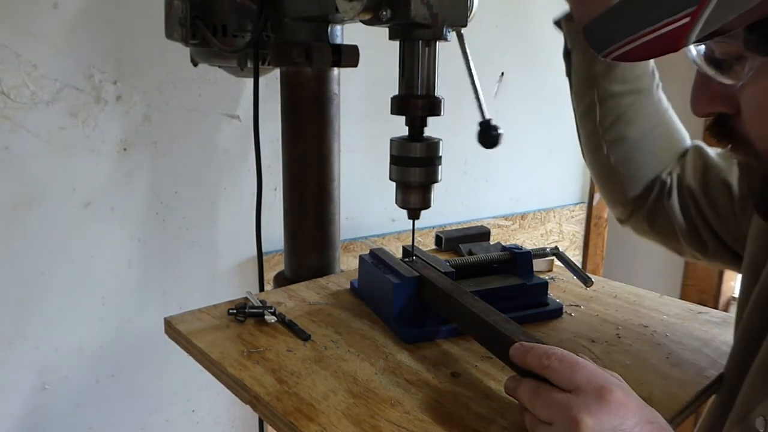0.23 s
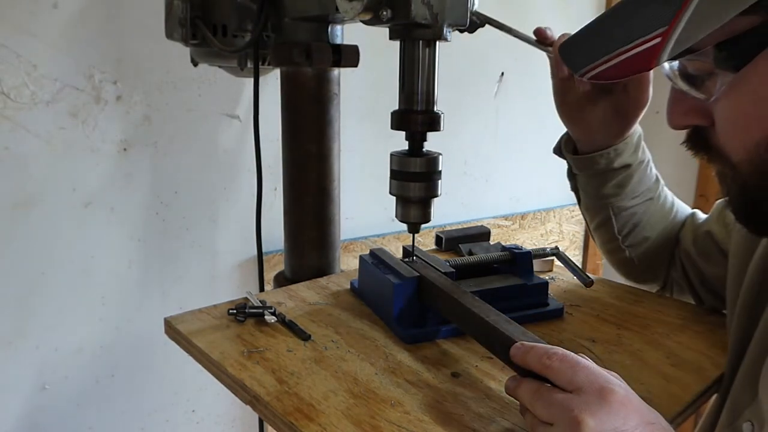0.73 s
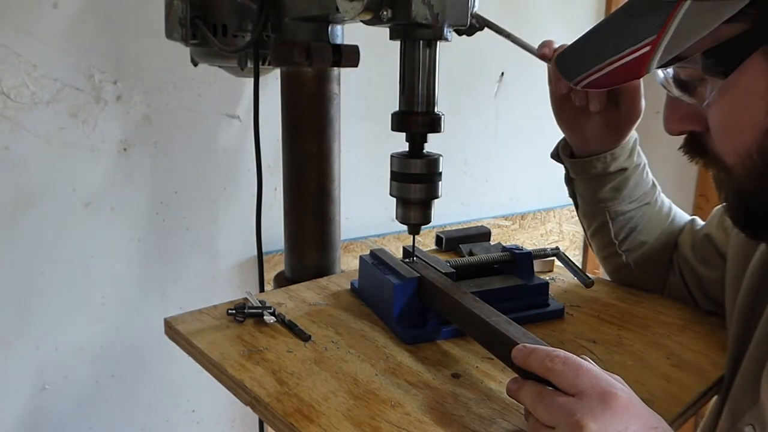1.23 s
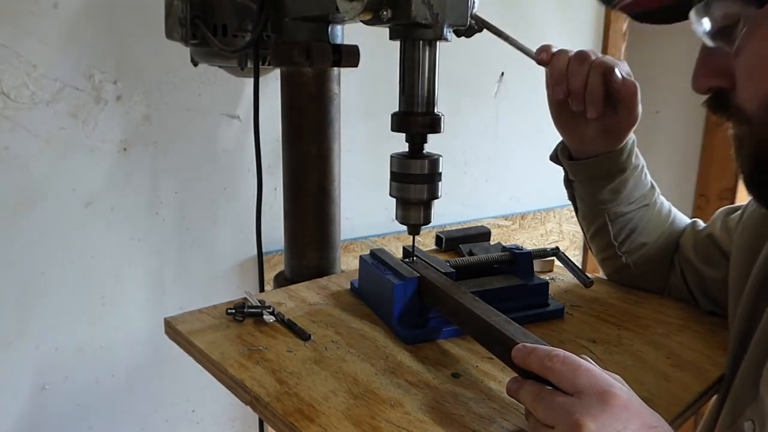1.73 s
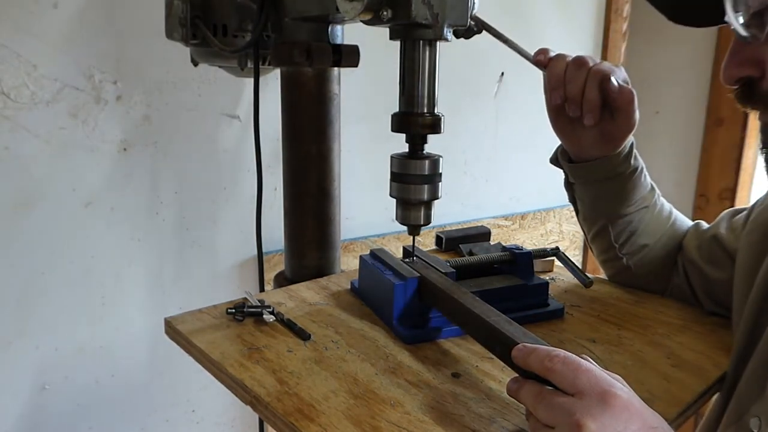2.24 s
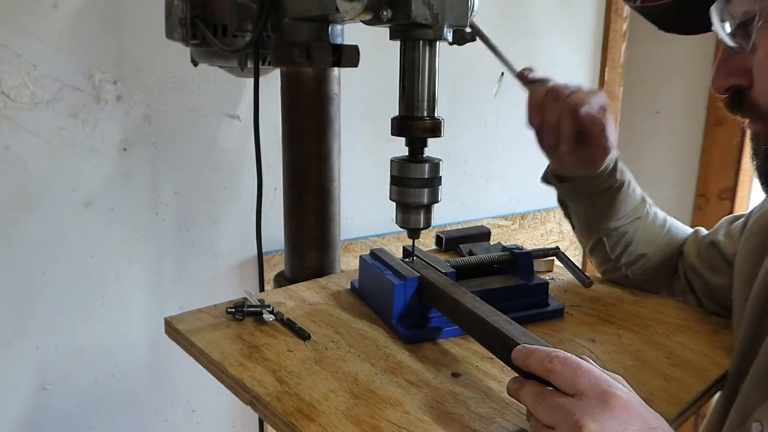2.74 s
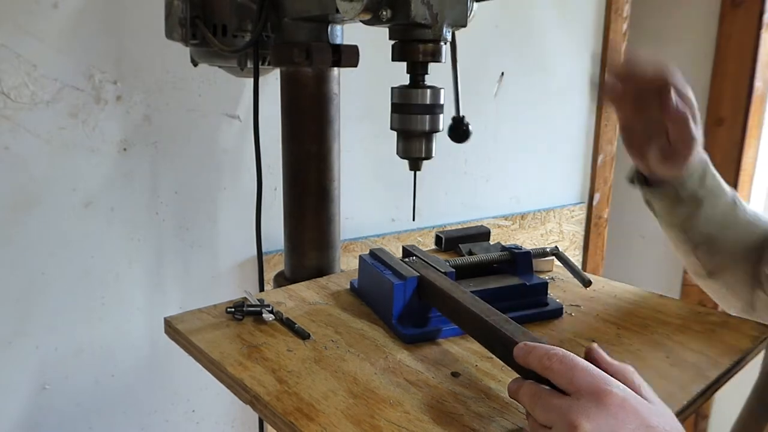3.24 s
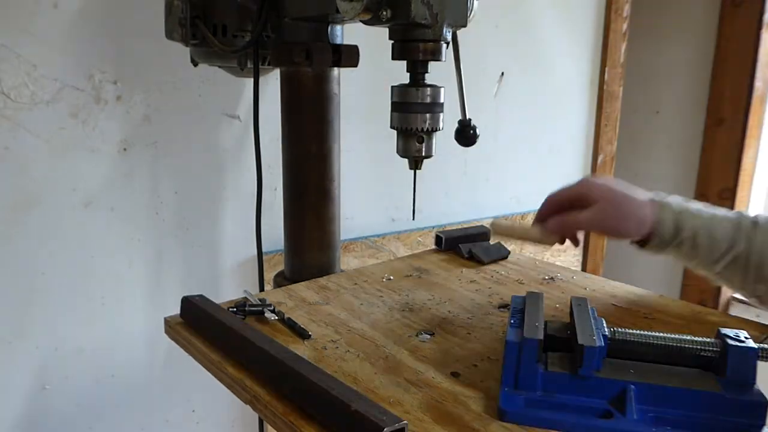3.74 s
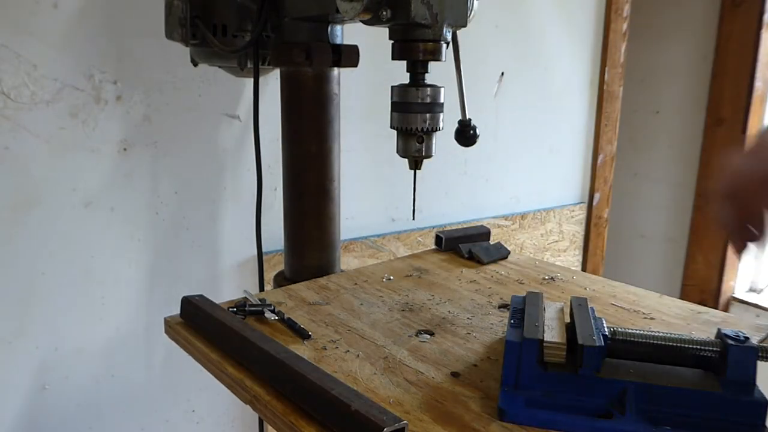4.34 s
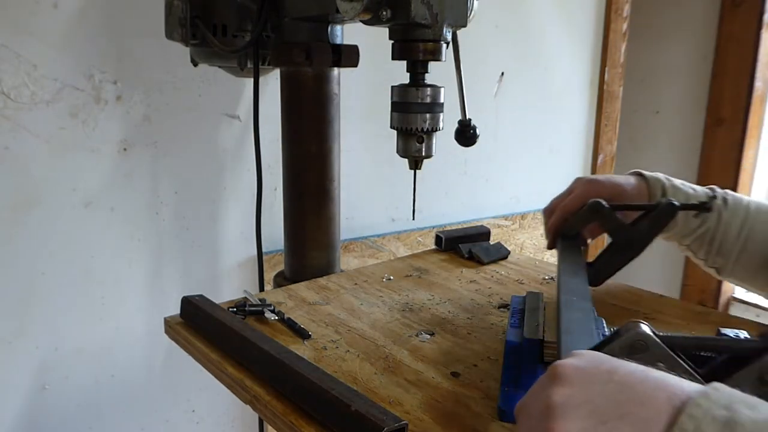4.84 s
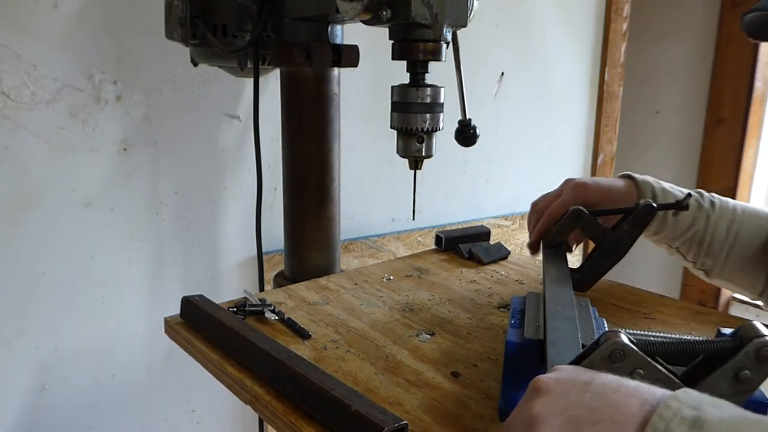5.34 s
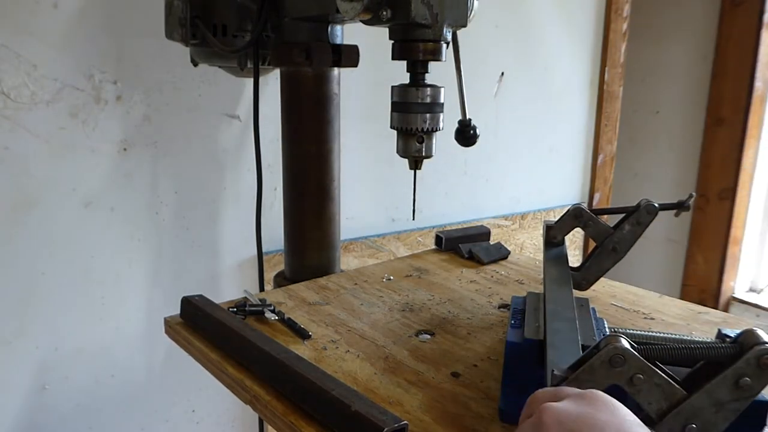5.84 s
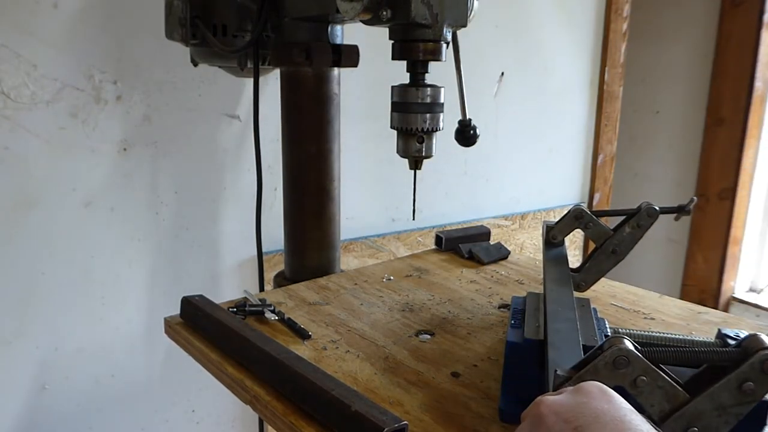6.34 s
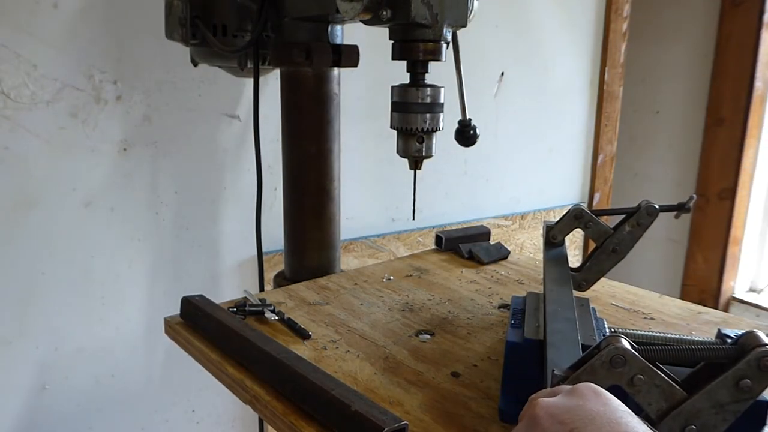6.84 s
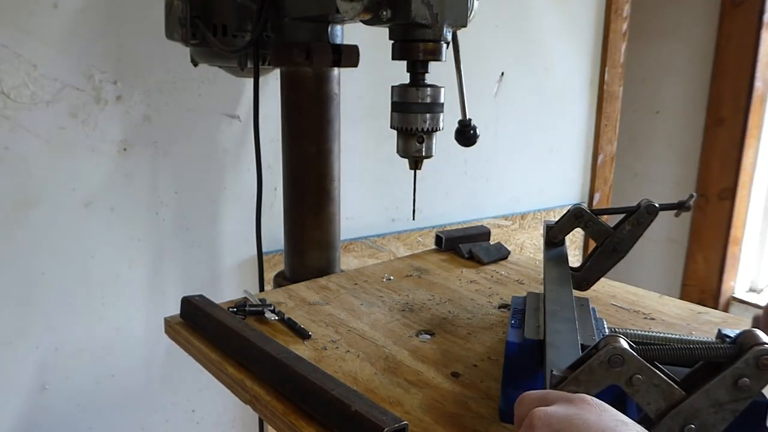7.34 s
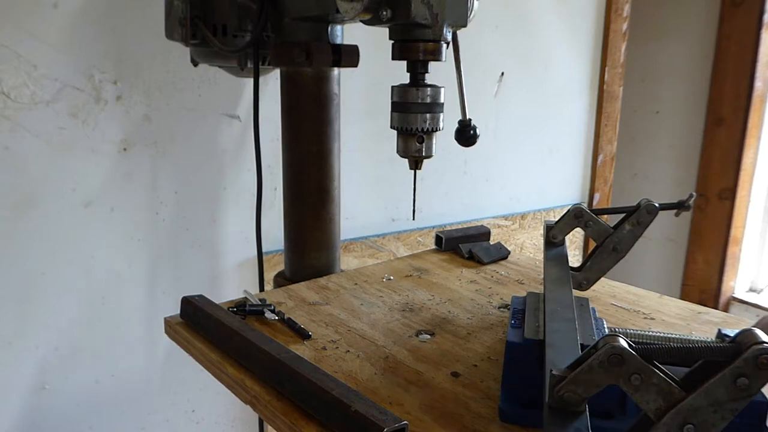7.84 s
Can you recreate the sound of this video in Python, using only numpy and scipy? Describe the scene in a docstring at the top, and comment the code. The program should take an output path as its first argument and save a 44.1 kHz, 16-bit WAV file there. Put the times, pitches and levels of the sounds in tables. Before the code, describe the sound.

Close in a small workshop, a drill press hums and rattles steadily while its bit scrapes, chatters and squeaks in steel tubing. It grabs on breaking through, the quill snaps back with a loud clack, and the machine abruptly stops. In the quiet, a wood block is tapped into a vise with dull, clicky knocks. Steel then knocks and snaps, two blows very sharp, followed by small clinks, soft rubbing and near silence.

```python
"""A drill press bores square steel tubing in a small workshop: hum and belt rattle ring its castings while the
fed bit scrapes, chatters and squeaks, then breaks through the wall. The quill springs back with a clack and the
machine sound breaks off. A wood block is then knocked down into the vise, and tubing and clamps knock, snap and
clink on the plywood table. Noise through resonances makes the cuts and cracks; decaying sines make the rings."""
import sys
import numpy as np
from scipy import signal
from scipy.fft import rfft, irfft, next_fast_len
from scipy.io import wavfile

SR = 44100
rng = np.random.default_rng(int(sys.argv[2]) if len(sys.argv) > 2 else 0)


def store_pcm(level_fs):
    """Save levels as 16-bit WAV."""
    pcm = np.round(np.clip(level_fs, -1, 1) * 32767).astype(np.int16)
    wavfile.write(sys.argv[1], SR, np.atleast_2d(pcm).T)


N = 356328
T = np.arange(N) / SR

QUILL_S = 3.184  # the quill reaches its stop

# modes of the stock in the vise and the steel around it: f/Hz, level/dB, t60/s
STEEL = [(444, -11.5, 0.2), (541, -5, 0.16), (618, -11, 0.23), (824, -4.5, 0.23), (937, -2, 0.23),
         (1034, 4, 0.12), (1079, 6, 0.21), (1310, -3.5, 0.17), (1422, 0, 0.28), (1540, -2, 0.26),
         (1600, 0.5, 0.23), (1726, 0.5, 0.13)]
# crowd of short modes in steel: f/Hz, density/dB per Hz
STEEL_CRACK = [(30, -42.5), (100, -37.5), (170, -22.5), (280, -15), (500, -7), (1100, 8.5), (1900, 5.5),
               (2150, -8.5), (3600, -14.5), (4700, -8), (6500, -11), (9000, -15), (12000, -21),
               (13200, -19.5), (15000, -20), (16000, -39)]
# modes of the plywood table: f/Hz, level/dB, t60/s
TABLE = [(369.7, 3, 0.7), (435, 0.5, 0.22), (3480, -29.5, .9)]
# modes of the stand: f/Hz, level/dB, t60/s
STAND = [(66, -2.5, 0.07), (100, -8, 0.1)]


def undb(db):
    """Decibels to gain."""
    return 10 ** (np.asarray(db) / 20)


def unit(x):
    """Scale to rms 1."""
    return x / np.sqrt(np.mean(x ** 2))


def curve(rows):
    """Gain over time from (t/s, level/dB) rows."""
    return undb(np.interp(T, *np.transpose(rows)))


def fade(t, t60):
    """Exponential decay that falls 60 dB in t60 seconds."""
    return np.exp(-np.log(1000) * t / t60)


def walk(rate):
    """Smooth random wander, spread near 1, with a new target `rate` times a second."""
    knots = rng.standard_normal(4096)
    return np.interp(T * rate, np.arange(len(knots)), knots)


def grains(per_s, spread_db):
    """Random tiny impacts of uneven size, as mid and side."""
    hits = rng.random(N) < per_s / SR
    sizes = undb(spread_db * rng.standard_normal(N))
    return unit(hits * sizes * rng.standard_normal((2, N)))


def colour(x, points, peaks=()):
    """Minimum-phase filter from a broad (f/Hz, dB) spectrum plus (f/Hz, width/Hz, dB) resonances."""
    size = 2 * next_fast_len(x.shape[-1] // 2 + 2048)
    f = np.arange(size // 2 + 1) * SR / size
    hz, db = np.transpose(points)
    power = undb(np.interp(np.log(f + 1), np.log(hz), db)) ** 2
    for centre, width, peak_db in peaks:
        power += undb(peak_db) ** 2 / (1 + ((f - centre) / width) ** 2) ** 2
    # folding the cepstrum keeps all the ringing after the blow
    cepstrum = irfft(np.log(power))[:size // 2]
    cepstrum[0] /= 2
    return irfft(rfft(x, size) * np.exp(rfft(cepstrum, size)))[..., :x.shape[-1]]


def resonances(modes, lift_db):
    """The modes of a body as the resonances that a rub or a rattle passes through."""
    return [(hz, 16, db + lift_db) for hz, db, _ in modes]  # each 16 Hz wide


def sing(x, hz, q):
    """A narrow resonance whose centre moves: shift it down to 0 Hz, smooth, shift it back."""
    turn = np.exp(2j * np.pi * np.cumsum(hz) / SR)
    pole = np.exp(-np.pi * hz.mean() / q / SR)
    return unit((signal.lfilter([1], [1, -pole], x / turn) * turn).real)


def add(out, s, sound):
    """Mix a sound in at its time."""
    start = int(s * SR)
    out[:, start:start + sound.shape[1]] += sound[:, :N - start]


def widen(x, side_db):
    """Change the side of a mid and side pair."""
    return x * undb([[0], [side_db]])


def chime(modes, rise_s, scatter, size):
    """A part rings in its own modes after a strike; close reflections roughen the ring."""
    t = np.arange(size) / SR
    out = np.zeros((2, size))
    for hz, db, t60 in modes:
        echoes = signal.resample(rng.standard_normal((2, 2, size // 300)), size, axis=-1)
        shimmer = 1 + scatter * (echoes[0] + 1j * echoes[1])
        start_phase = np.exp(2j * np.pi * rng.random((2, 1)))
        tone = (shimmer * np.exp(2j * np.pi * hz * t) * start_phase).imag
        out += undb(db) * fade(t, t60) * tone
    return out * (1 - np.exp(-t / rise_s))


def struck(s, db, contact_s, weight, bright):
    """A clean knock: longer contact is heavier and duller, by (dB at 1 ms, dB per doubling)."""
    doublings = np.log2(abs(contact_s) * 1000 + 1e-3)
    weight_db = weight[0] + weight[1] * doublings
    bright_db = bright[0] + bright[1] * doublings
    return s, db, weight_db, bright_db, contact_s, 0


def blows(rows, modes, spectrum, tick_db, crack_t60, room_db, room_t60, tail_db, ring_db, trim_db, lift_db=10):
    """Each blow is a contact tick, a crack that rattles through the modes while the part slides, a ring and a room tail.

    Rows: t/s, level/dB, weight/dB (lows re level), brightness/dB (highs re level), contact/s, slide/s.
    """
    judder_per_s, judder_db = 270, 3.5  # loose parts rattle as the blow dies away
    t = np.arange(SR * 2 // 5) / SR
    early = SR // 50  # levels are set over the first 20 ms
    hz, db, t60 = np.transpose(modes)
    bank = undb(db)[:, None] * fade(t, t60[:, None]) * np.exp(2j * np.pi * hz[:, None] * t)
    edges = ((700, "low"), ((700, 2500), "band"), (2500, "high"))
    bands = [signal.butter(3, edge, kind, fs=SR, output="sos") for edge, kind in edges]
    out = np.zeros((2, N))
    for s, body_db, weight_db, bright_db, contact_s, length_s in rows:
        press = 1 - np.exp(-t / (abs(contact_s) + 1 / SR))
        free = np.maximum(t - length_s, 0)
        envelope = fade(free, crack_t60) + undb(room_db) * fade(free, room_t60) + undb(tail_db) * fade(free, 0.9)
        # every point of contact shares the force out differently among the modes
        share_phase = np.exp(2j * np.pi * rng.random((2, len(hz))))
        share = undb(2 * rng.standard_normal((2, len(hz)))) * share_phase
        ring = (share @ bank).imag * press
        wobble = np.interp(t * judder_per_s, np.arange(len(t)), rng.standard_normal(len(t)))
        force = rng.standard_normal((2, len(t))) * envelope * undb(judder_db * wobble) * press
        force[0, 0] += undb(tick_db) * press[SR // 4000]  # only a brief contact gives a sharp tick
        crack = colour(force, spectrum, resonances(modes, lift_db))
        sound = crack / crack[:, :early].std() + undb(ring_db) * ring / ring[:, :early].std()
        for sos, band_db in zip(bands, (weight_db, 0, bright_db)):
            part = signal.sosfilt(sos, sound)
            add(out, s, part / part[0, :early].std() * undb(body_db + band_db + trim_db))
    return out


def clicks(rows, spectrum, buzz_db, buzz_t60, room_db):
    """A hard contact: one sharp pulse, a few milliseconds of buzzing rebounds, and the room."""
    t = np.arange(SR // 4) / SR
    force = np.zeros((2, N))
    for s, db in rows:
        envelope = undb(buzz_db) * fade(t, buzz_t60) + undb(room_db) * fade(t, 0.22)
        hit = rng.standard_normal((2, len(t))) * envelope
        hit[0, 0] = 1
        add(force, s, undb(db) * hit)
    return colour(force, spectrum)


def drill(chatter_db=2.5, scrape_db=-0.5, rasp_db=1.36, drift=.025, flicker_hz=450):
    """Rattle pulsing with the motor's torque, hum whose upper tones flicker, and chips tearing off under the bit."""
    # pressure on the bit: t/s, cutting level/dB
    feed_points = [(0, -25.5), (.3, -34.5), (.79, -25.5), (.86, -20), (2.15, -21), (2.55, -25),
                   (2.85, -22.5), (2.92, -40), (3.12, -23.5), (3.26, -34.5)]
    # motor and pulley tones: f/Hz, level before flicker/dB rms
    hum_tones = [(150.4, -57.5), (203, -58), (240, -56), (366, -47), (480, -41.5), (533, -37.5), (720, -40),
                 (868, -39.5), (959, -35.5)]
    # resonances of head, belt cover and column: f/Hz, width/Hz, level/dB
    castings = [(456, 18, -1.5), (537, 19, 3.5), (606.7, 17, 4.5), (688, 21, 1), (802, 16, 5.5),
                (872.6, 20, 4.5), (923, 13, 3.5), (1052, 23, 0.5), (1154, 26, 4.5), (1293, 14, 2.5),
                (1437, 41, -5.5), (1645, 36, -1), (1798, 28, 1), (1908, 26, -1.5), (2072, 44, 3.5),
                (2175, 14, 1), (2458, 14, 5), (2565, 11, 5.5), (2690, 110, -5), (2995, 27, -1),
                (3310, 26, -1.5), (3600, 70, -9.5), (4520, 50, -3.5), (5490, 29, -10.5), (5800, 50, -11.5),
                (6010, 26, -8), (6200, 30, -11), (7160, 160, -13.5)]
    # resonances of bit and stock that chatter in the cut: f/Hz, level re feed/dB
    chatter_modes = [(850, -17), (905, -11.5), (1290, -17), (1400, -12), (1900, -14), (3540, -24.5)]
    # broad spectra of rattle and of scrape: f/Hz, density/dB per Hz
    rattle_spectrum = [(25, -47.5), (100, -45.5), (170, -26.5), (300, -15.5), (500, -14.5), (1000, -12),
                       (2400, -8), (4400, -11), (5200, -17.5), (7400, -19), (8600, -21.5), (11700, -20.5),
                       (13000, -25), (16000, -31.5)]
    scrape_spectrum = [(150, -36.5), (400, -9), (600, -5.5), (1000, 1.5), (1400, 3.5), (1900, -0.5),
                       (3000, -1.5), (4600, -5), (5200, -11), (7200, -11), (8500, -16), (16000, -30.5)]
    run_db, ease_db_per_s = -20, 7.5  # rattle level, and how fast it quietens once the quill is home
    stop_s = 3.475

    feed = curve(feed_points)
    running = undb(run_db - ease_db_per_s * np.maximum(T - QUILL_S, 0))
    motor = np.sin(2 * np.pi * hum_tones[2][0] * T)
    shake = rng.standard_normal((2, N)) * (1 + 0.19 * motor) * undb(1.6 * walk(40))
    rattle = unit(colour(shake, rattle_spectrum, castings)) * running
    hum = np.zeros(N)
    for hz, db in hum_tones:
        flicker = undb(db + hz / flicker_hz * walk(6.7))  # deeper for higher tones
        hum += flicker * np.sqrt(2) * np.sin(2 * np.pi * hz * T + 0.54 * walk(3.7))
    # the motor growls more loudly under load
    growl = feed * undb(-28) * motor
    # the edge bites unevenly; each resonance of bit and stock flares up and shifts on its own
    tearing = grains(per_s=6000, spread_db=1.0) * undb(rasp_db * walk(90))
    scrape = unit(colour(tearing, scrape_spectrum, castings)) * undb(scrape_db)
    chatter = np.zeros((2, N))
    for hz, db in chatter_modes:
        flaring = tearing * undb(chatter_db * walk(22))
        chatter += sing(flaring, hz * (1 + drift * walk(10)), q=67) * undb(db)
    machine = rattle + (scrape + chatter) * feed + np.outer([1, 0], hum + growl)
    on = np.clip((stop_s - T) * SR / 64, 0, 1)
    # a faint, short tail is left where the sound breaks off
    tail = undb(-18.5) * fade(np.maximum(T - stop_s, 0), 0.34)
    return machine * np.maximum(on, tail)


def swarf():
    """The bit squeaks where it sticks, and curls of swarf scratch round the hole."""
    # scratches, as swells centred on t: t/s, length/s, level/dB
    scratches = [(0.838, 0.036, -30), (1.242, 0.017, -25), (1.552, .05, -33), (1.896, 0.053, -26.5)]
    # spectrum of a scratch: f/Hz, density/dB per Hz
    scratch_colour = [(1500, -32), (4000, -5), (6500, 9), (15000, -21)]
    # squeaks: t/s, f/Hz, level/dB
    squeaks = [(1.46, 1950, -15.5), (1.621, 1390, -16), (1.675, 1434, -14), (1.925, 899, -13),
               (2.115, 1357, -12.5), (2.78, 1870, -12)]
    swells = sum(undb(db) * np.exp(-(2 * (T - s) / length) ** 2) for s, length, db in scratches)
    out = unit(colour(grains(per_s=3000, spread_db=-2), scratch_colour)) * swells
    for s, hz, db in squeaks:
        add(out, s, chime([(hz, db, 0.17)], rise_s=0.0092, scatter=0.35, size=SR // 3))
    return out


def breakthrough(weight_db=0, bright_db=-14, contact_s=0.011):
    """The bit grabs as it breaks through the tube wall and sets the table humming."""
    break_s, grab_s = 2.781, 0.037  # time and length of the grab
    grab_db, hum_db = -22.5, -29
    row = (break_s, grab_db, weight_db, bright_db, contact_s, grab_s)
    out = blows([row], STEEL, STEEL_CRACK, tick_db=-2, crack_t60=0.083, room_db=-18.5, room_t60=0.18,
                tail_db=-33.5, ring_db=1.5, trim_db=0.5)
    add(out, break_s, undb(hum_db) * chime(TABLE, rise_s=0.0052, scatter=0, size=SR))
    return out


def quill(level_db=-11.5, contact_s=.0003, weight_db=-8, bright_db=-1, thud_db=-25):
    """The quill clacks against its stop and thuds down the stand."""
    row = (QUILL_S, level_db, weight_db, bright_db, contact_s, 0)
    out = blows([row], STEEL, STEEL_CRACK, tick_db=4.0, crack_t60=0.1, room_db=-14, room_t60=0.18,
                tail_db=-31.0, ring_db=-8.5, trim_db=-1.5)
    thud = chime(STAND, rise_s=.004, scatter=0.55, size=SR // 3)
    add(out, QUILL_S, undb(level_db + thud_db) * thud)
    return out


def block():
    """The wood block is pushed and tapped down between the jaws: dull body modes under a hard click."""
    # pushes and taps: t/s, level/dB, contact/s, click level/dB
    taps = [(3.603, -49, 0.0027, -25), (3.913, -38, 0.0034, -30), (3.924, -38, 0.0043, -37),
            (4.0001, -33, 0.0011, -4), (4.0522, -33, 0.00018, 2), (4.1144, -28.5, 0.00061, -1.5),
            (4.132, -38, .0005, -11), (4.2141, -31.5, 0.00029, 2.5)]
    # modes of the block: f/Hz, level/dB, t60/s
    wood = [(548, -1, 0.24), (784, -3, 0.22), (1081, 11.5, 0.26), (1595, 7, 0.22), (1930, 8, 0.17),
            (2860, -12, .08), (3140, -12.5, 0.07)]
    # spectra of the crowd of short wood modes and of a hard contact on wood: f/Hz, density/dB per Hz
    wood_crack = [(30, -37), (100, -24), (170, -10), (600, -3), (1100, 15), (1500, 12.5), (2200, 2),
                  (3000, -30), (3800, -23), (4900, -12), (5600, -27), (11500, -29), (16000, -59)]
    wood_click = [(200, -26.5), (1300, -6), (2100, 2), (2900, -5), (4800, -24), (7000, -40), (11500, -19.5),
                  (15000, -34)]
    weight, bright = (-14.5, 1.2), (-5.5, -2.4)  # dB re level at 1 ms of contact, dB per doubling
    rows = [struck(s, db, contact_s, weight, bright) for s, db, contact_s, _ in taps]
    body = blows(rows, wood, wood_crack, tick_db=21.5, crack_t60=0.017, room_db=-15.0, room_t60=0.22,
                 tail_db=-36, ring_db=-4.0, trim_db=-2.5)
    click_rows = [(s, click_db) for s, *_, click_db in taps]
    return body + clicks(click_rows, wood_click, buzz_db=-26, buzz_t60=.01, room_db=-25.5)


def tubing(drag_contact_s=0.013):
    """Knocks and drags ring the part they touch, the tube wall, the table and the stand; each knock then settles."""
    # the tubing knocks a steel part: t/s, level/dB, contact/s, part, ring re level/dB
    knock_rows = [(4.357, -49.5, 0.0042, "jaw", -16), (4.982, -24.5, 0.0011, "jaw", 0.5),
                  (5.019, -33, 0.0014, "jaw", -4), (5.178, -30, 0.0014, "lever", -16),
                  (5.231, -42.5, 0.0031, "lever", -24), (5.316, -17.5, 0.0029, "jaw", -10),
                  (5.662, -19, 0.00097, "jaw", -14), (5.843, -37, 0.0012, "wall", -19),
                  (5.944, -34.5, 0.00084, "wall", -17), (6.182, -39.5, 0.0016, "lever", 2.5),
                  (6.254, -29, 0.0019, "wall", -18), (6.307, -30.5, 0.0016, "clamp", -4),
                  (6.364, -33, 0.0012, "lever", -3), (6.422, -37, 0.0026, "wall", -24),
                  (6.628, -37, 0.00067, "clamp", -12), (6.699, -46.5, 0.0046, "wall", -29),
                  (6.76, -40, 0.0003, "wall", -14), (6.784, -34.5, 0.0022, "wall", -33),
                  (6.8144, -38.5, 0.00019, "lever", 1), (7.158, -53, 0.002, "jaw", -26.5),
                  (7.665, -57, 0.0018, "jaw", -30), (7.813, -52, 0.0014, "jaw", -30),
                  (7.927, -55, 0.0024, "jaw", -27)]
    # steel dragged a short way: t/s, length/s, level/dB, weight/dB, brightness/dB, part, ring re level/dB
    drag_rows = [(3.645, 0.011, -32, -11.5, -0.5, "jaw", -5),
                 (4.301, 0.0073, -31.5, -17, -9, "lever", -0.5),
                 (4.331, 0.023, -32, -14, -10.5, "lever", 3.5), (4.964, 0.0022, -34, -4, -11, "jaw", -22),
                 (5.3, .012, -22.5, -8, -10, "jaw", -22), (6.01, 0.015, -43.5, -2, -24, "wall", -31),
                 (6.064, .02, -48, -14, -21, "wall", -30), (6.141, 0.041, -47.5, -9, -29, "clamp", -26),
                 (6.225, 0.015, -39.5, -18, -27, "wall", -30), (6.645, 0.017, -32, -8, -12.5, "lever", -9)]
    # modes of vise jaw, clamp frame, release lever and tube wall: f/Hz, level/dB, t60/s
    jaw_modes = [(4120, -10.5, 0.22), (4210, -4.5, 0.18), (4820, -2.5, 0.14), (4600, -7, 0.05),
                 (5720, -15, 0.12), (6200, -15.5, 0.11), (2960, -7.5, .09)]
    clamp_modes = [(4260, -2.5, 0.2), (4800, -1, 0.18), (5660, -3.5, 0.16), (5950, -3, 0.065),
                   (7343, -7, 0.11), (7913, 0, 0.18), (9300, -12, 0.16), (12500, -8, 0.12),
                   (15200, -3, 0.098)]
    lever_modes = [(4300, -20.5, 0.35), (7580, -11, 0.11), (8070, -7.5, 0.13), (9120, -8.5, 0.074),
                   (9900, -11, 0.11), (15400, -12.5, 0.1)]
    wall_modes = [(2890, 7, 0.19), (3070, -2.5, 0.42), (4370, -7, 0.24)]
    # each part with how unevenly it rings (0-1)
    parts = {"jaw": (jaw_modes, 1), "clamp": (clamp_modes, 0.74), "lever": (lever_modes, 0.51), "wall": (wall_modes, 0.95)}
    weight, bright = (-17, 10.4), (-9.5, -4.5)  # dB re level at 1 ms of contact, dB per doubling
    # after a knock the tubing rocks back and settles softly
    settle_s, settle_spread_s, settle_contact_s = .05, 0.0045, 0.0029
    settle_db, settle_max_db = -12, -37  # re the knock, and the ceiling
    wall_db, table_db, stand_db = -24, -11, -26  # wall re level; table and stand re level + weight
    wall_max_db = -39  # ceiling on the gain of the wall's ring

    knocks = [struck(s, db, contact_s, weight, bright) for s, db, contact_s, _, _ in knock_rows]
    drags = [(s, db, heavy_db, bright_db, drag_contact_s, length)
             for s, length, db, heavy_db, bright_db, _, _ in drag_rows]
    settles = []
    for s, db, *_ in knock_rows:
        late_s = s + settle_s + settle_spread_s * rng.standard_normal()
        soft_db = min(db + settle_db, settle_max_db)
        settles.append(struck(late_s, soft_db, settle_contact_s, weight, bright))
    out = blows(knocks + drags + settles, STEEL, STEEL_CRACK, tick_db=33.5, crack_t60=0.042, room_db=0,
                room_t60=0.21, tail_db=-22.0, ring_db=-2.5, trim_db=-1.0)
    # one ring each of table, stand and wall, shared by every knock and drag
    table = chime(TABLE, rise_s=0.0052, scatter=0, size=SR)
    stand = chime(STAND, rise_s=0.0045, scatter=0.85, size=SR // 3)
    wall = chime(wall_modes, rise_s=0.00049, scatter=parts["wall"][1], size=SR // 3)
    for (s, db, weight_db, _, _, length), (*_, part, ring_db) in zip(knocks + drags, knock_rows + drag_rows):
        catch = s + length / 4  # a dragged part catches early in its slide
        modes, scatter = parts[part]
        add(out, catch, undb(db + ring_db) * chime(modes, rise_s=0.00072, scatter=scatter, size=SR // 5))
        add(out, catch, undb(min(db + wall_db, wall_max_db)) * wall)
        add(out, s + length, undb(db + weight_db + table_db) * table)
        add(out, s, undb(db + weight_db + stand_db) * stand)
    return out


def snaps():
    """Steel meets steel squarely: the quill stop, the clamps locking, their levers ticking."""
    # snaps: t/s, pulse level/dB
    snap_rows = [(3.1855, 3.5), (3.545, -20), (5.3138, 9), (5.6625, 4.5), (5.869, -23), (6.294, -27),
                 (6.645, -14.5), (7.105, -32)]
    # spectrum of a hard contact on steel: f/Hz, density/dB per Hz
    snap_colour = [(200, -36), (3400, -4.5), (4400, 2), (6000, -4), (8500, -11), (15500, -15.5)]
    return clicks(snap_rows, snap_colour, buzz_db=-11.0, buzz_t60=0.013, room_db=-26.0)


def background():
    """Still workshop air as coloured noise, and sleeve and hands sliding about as grains through the steel modes."""
    # spectrum of the air: f/Hz, density/dB per Hz
    shop = [(25, -27), (149, -22), (427, -4), (863, -4.5), (1330, -8), (3520, -16), (7110, -16),
            (7710, -14.5), (9320, -10.5), (10700, -19.5), (14400, -20), (16000, -29.5)]
    # slides of sleeve and hands: t/s, length/s, level/dB
    slides = [(4.294, 0.19, -54.5), (5.8, 0.66, -54.5), (6.882, .05, -56.5), (8.0, .08, -63)]
    rise_db_per_s, fall_db_per_s = 32, 43.5  # each move swells and dies away alike
    air = unit(colour(rng.standard_normal((2, N)), shop)) * undb(-61.5)
    slips = grains(per_s=1100, spread_db=3)
    rub_spectrum = [(100, -39.5), (380, 0.5), (1000, 1), (2200, -10.5), (16000, -20.5)]
    rub = colour(slips, rub_spectrum, resonances(STEEL, lift_db=5.5))
    moves = []
    for s, length, db in slides:
        before = np.maximum(s - T, 0)
        after = np.maximum(T - s - length, 0)
        moves.append(db - rise_db_per_s * before - fall_db_per_s * after)
    return air + unit(rub) * undb(np.max(moves, axis=0) + 2 * walk(39))


def scene():
    """All sources as mid and side, each with its own width, turned into left and right."""
    # side against mid, narrowest near 1 kHz: f/Hz, level/dB
    width = [(30, -2), (70, -8.5), (140, -2.5), (500, -21.5), (1100, -25), (2000, -8.5), (4000, -9),
             (8000, -9.5), (14000, -8)]
    machine = widen(drill() + swarf() + breakthrough() + quill(), side_db=-1.5)
    wood_block = widen(block(), side_db=2)
    steel = widen(tubing() + snaps(), side_db=0)
    mid, side = machine + wood_block + steel + widen(background(), side_db=11.5)
    side = colour(side, width)
    return np.array([mid + side, mid - side])


def record(dry):
    """Peaks are clipped at full scale, then a steep low-pass cuts the top above 16 kHz."""
    low_pass = signal.ellip(8, .2, 70, 16000, fs=SR, output="sos")
    return signal.sosfilt(low_pass, np.clip(dry, -1, 1))


dry = scene()
out = record(dry)
store_pcm(out)
```